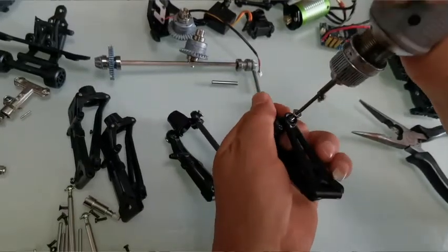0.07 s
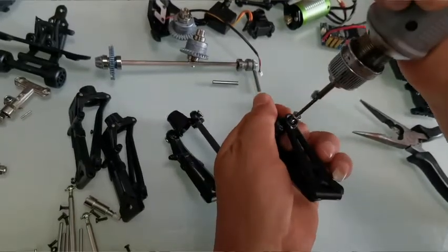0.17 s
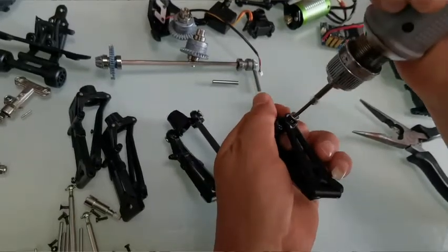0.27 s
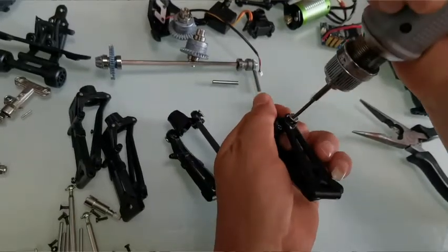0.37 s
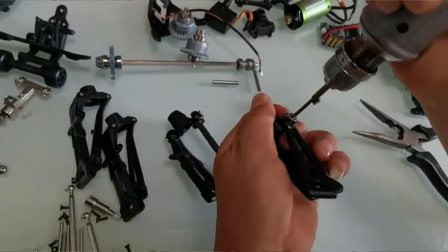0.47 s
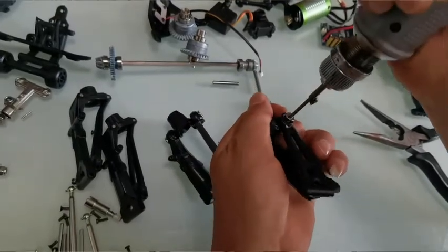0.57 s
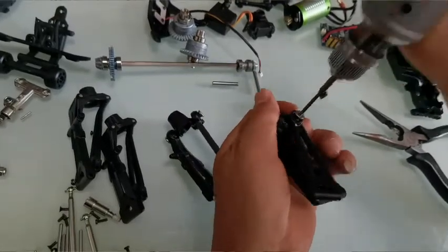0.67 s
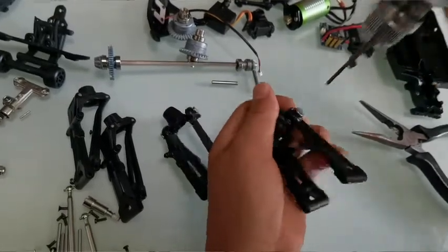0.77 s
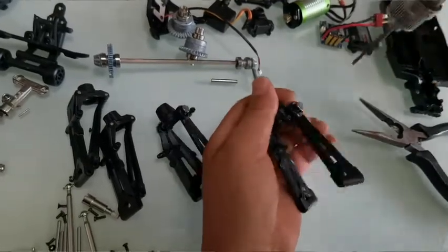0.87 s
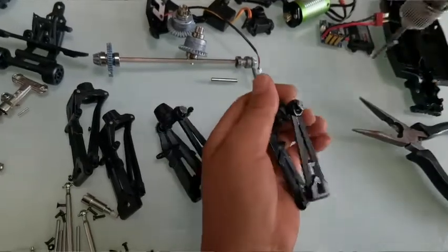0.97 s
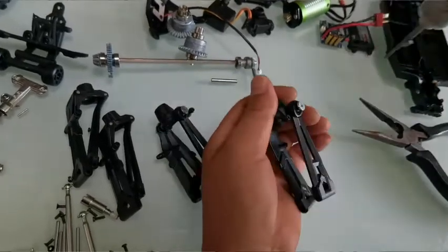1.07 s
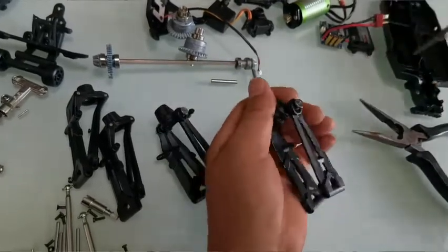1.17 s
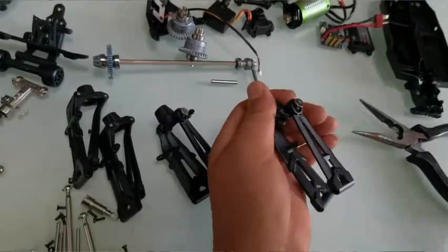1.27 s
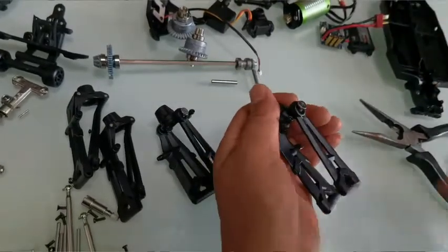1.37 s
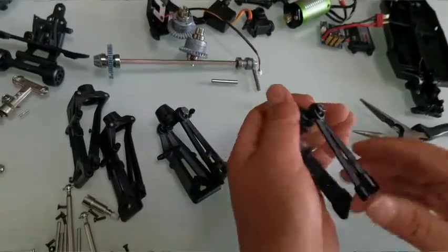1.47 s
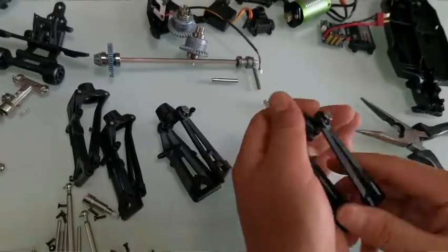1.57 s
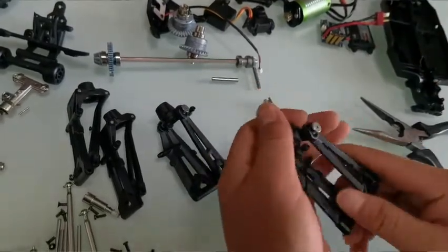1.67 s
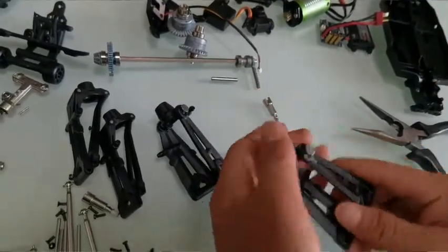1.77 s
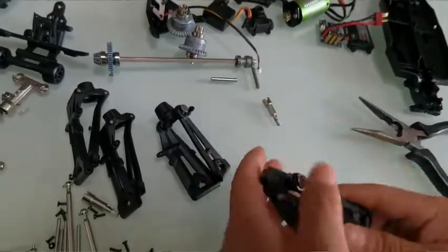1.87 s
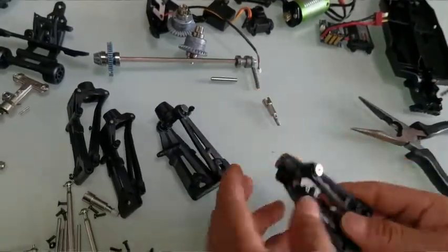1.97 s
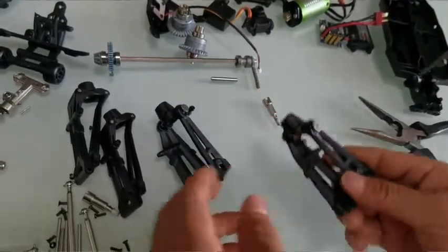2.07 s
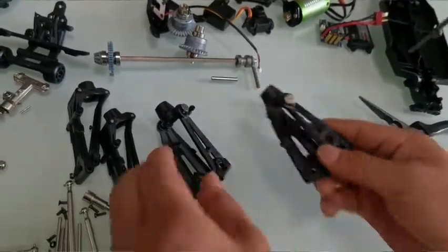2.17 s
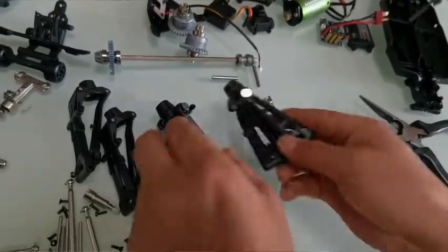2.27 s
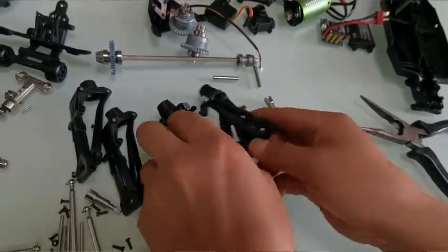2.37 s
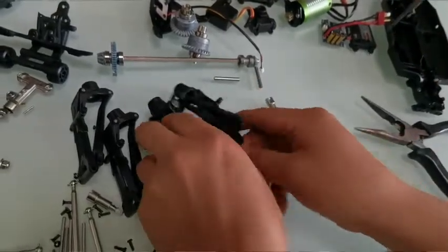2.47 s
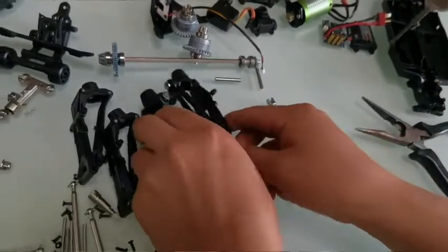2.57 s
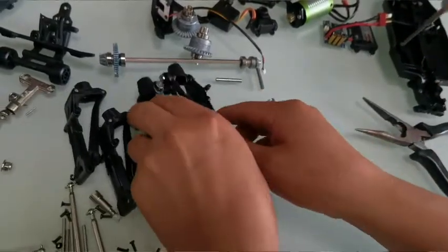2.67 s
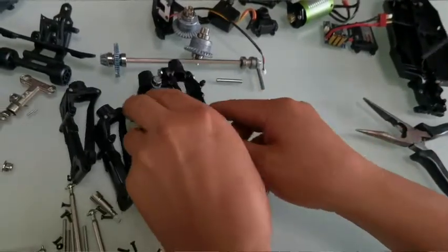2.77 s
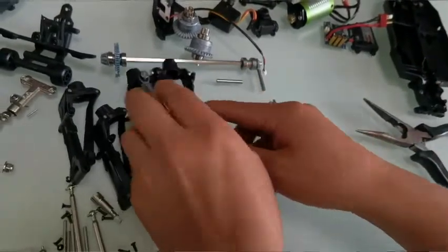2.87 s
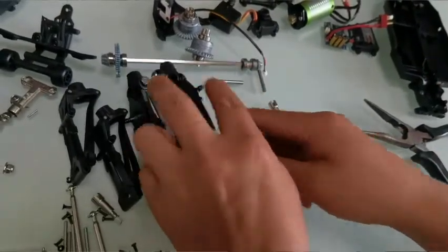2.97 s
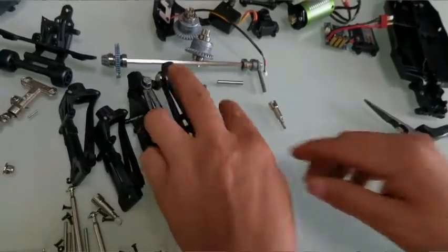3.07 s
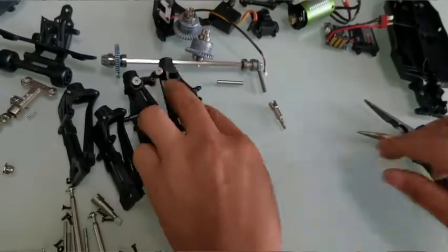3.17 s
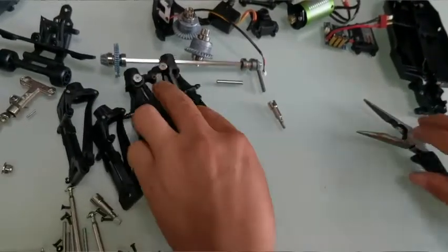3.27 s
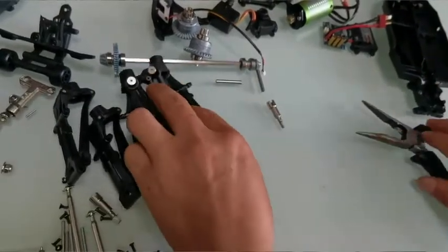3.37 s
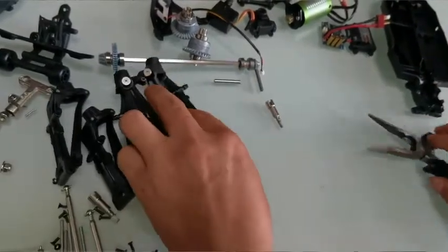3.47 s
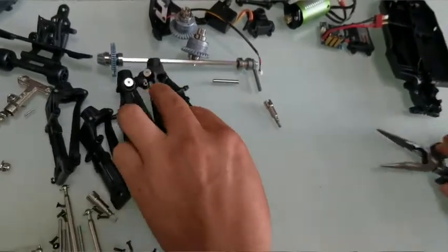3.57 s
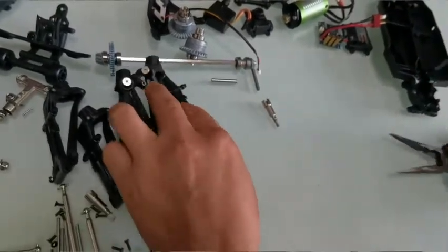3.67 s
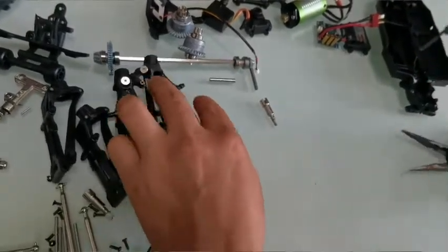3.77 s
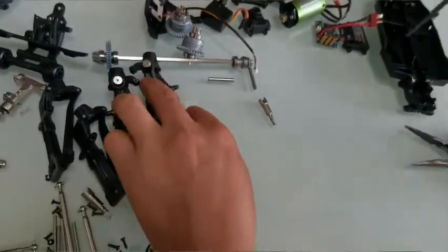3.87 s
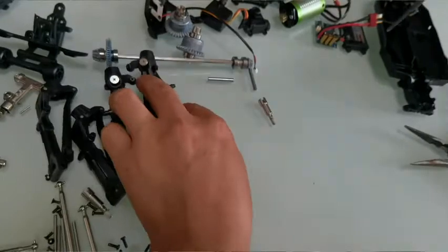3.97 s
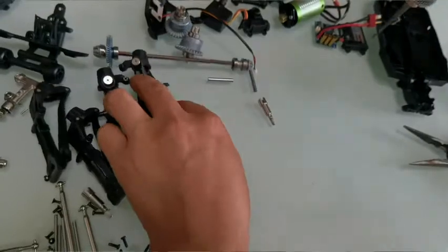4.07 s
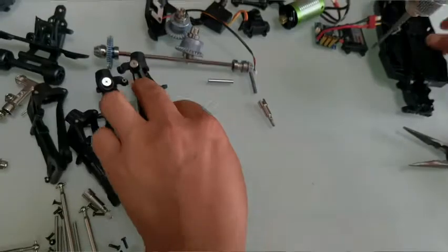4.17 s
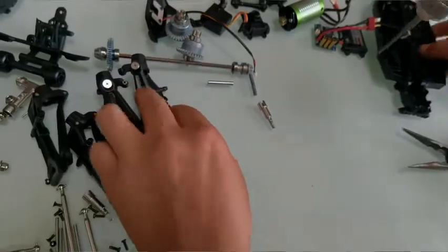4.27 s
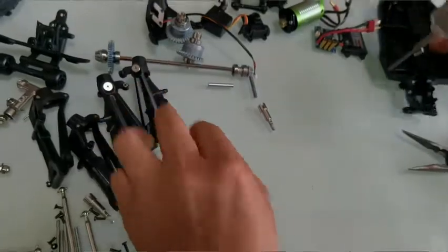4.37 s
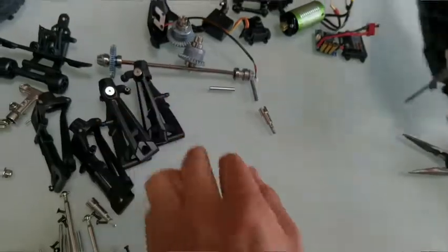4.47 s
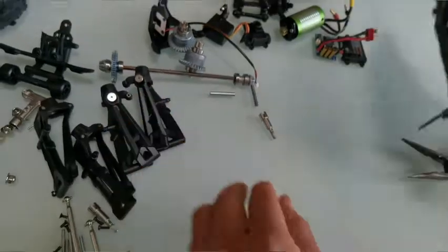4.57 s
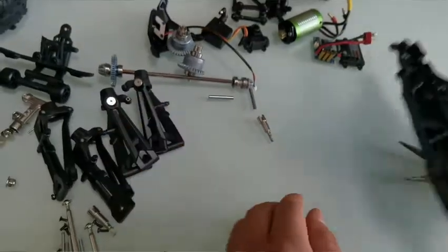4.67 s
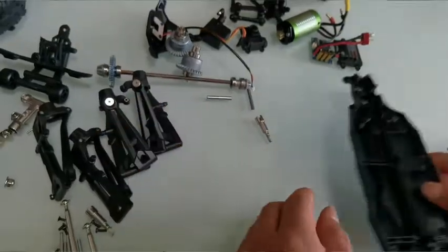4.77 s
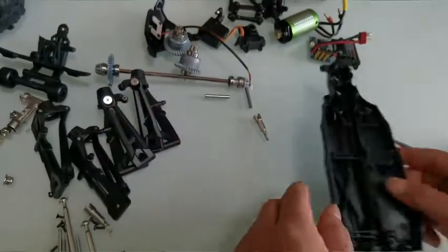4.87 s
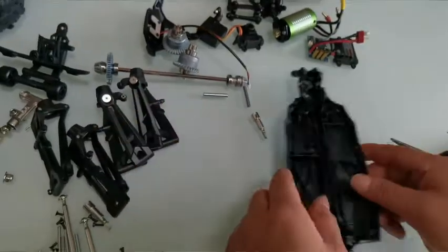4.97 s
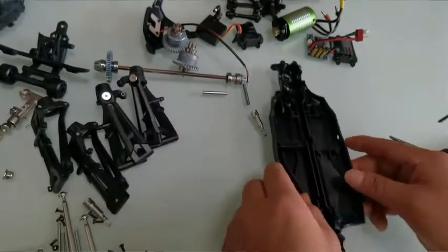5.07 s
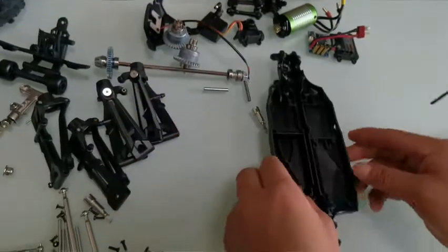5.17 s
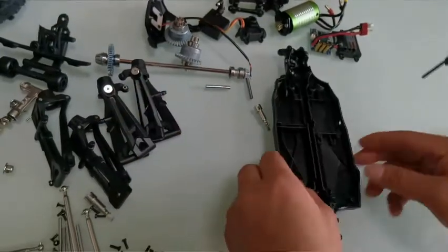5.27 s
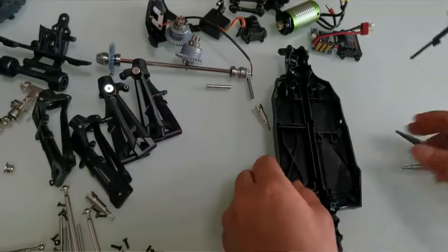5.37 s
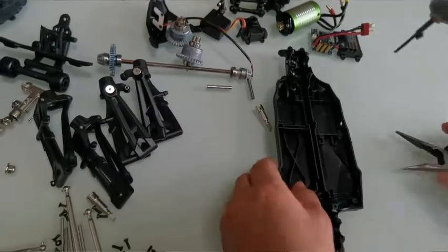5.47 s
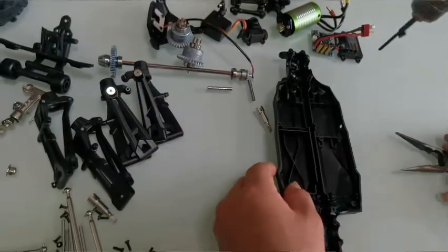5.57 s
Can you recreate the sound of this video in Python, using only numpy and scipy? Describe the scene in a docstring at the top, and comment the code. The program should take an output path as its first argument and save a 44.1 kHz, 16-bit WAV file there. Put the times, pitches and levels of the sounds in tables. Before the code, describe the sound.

A small cordless screwdriver whirs briefly and its clutch ratchets, then light plastic parts clatter and tap on a table before a hollow plastic shell knocks down.

```python
"""A cordless screwdriver spins up with grinding gears, brush buzz and gear whine, and drives a screw into
a plastic suspension arm; its clutch ratchets in dull and bright steel clacks until it stops on a rising tone.
Then plastic arms chatter and ring, pliers and parts tap on a work table amid faint bands of hiss,
a part squeaks, and arms bump the table top. Last, a hollow plastic chassis is set down: a crack, shell modes
and a buzz. Room air and a low rumble run throughout, heard from close above the table in a small room."""
import sys
import numpy as np
from scipy import signal
from scipy.fft import rfft, irfft
from scipy.io import wavfile
from scipy.ndimage import uniform_filter1d, map_coordinates

SR = 44100
rng = np.random.default_rng(int(sys.argv[2]) if len(sys.argv) > 2 else 0)


def dump(signal):
    """Clip the signal to [-1, 1] and save it as 16-bit WAV at the path in sys.argv[1]."""
    limited = np.clip(np.atleast_2d(signal).T, -1, 1)
    pcm = np.round(limited * 32767).astype(np.int16)
    wavfile.write(sys.argv[1], SR, pcm)


N = 248269
TIME = np.arange(N) / SR

# Table top colour. Each row: frequency in Hz, relative level in dB per Hz.
TABLE_COLOUR = [(40, -41), (120, -14.5), (330, -1.5), (620, 5.5), (950, 1), (1450, 8), (2300, 1.5),
                (3100, -1), (4300, -1), (5600, -11), (8200, -20), (11800, -27), (15500, -45.5)]

# trigger pressed, screw starts to bite, clutch breaks loose, trigger let go
ON_S, BITE_S, BREAK_S, OFF_S = .043, .293, .4727, .631
# gearbox swell after the start; shaft slowing under the brake
SWELL_S, BRAKE_S = 0.11, .04


def amp(db):
    """Decibels to gain."""
    return 10 ** (np.asarray(db) / 20)


def unit(x):
    """Scales to an rms of one."""
    return x / np.sqrt(np.mean(x ** 2) + 1e-20)


def read(points, hz):
    """Reads a table along a logarithmic frequency axis."""
    f, value = np.transpose(points)
    return np.interp(np.log(hz + 1), np.log(f + 1), value)


def curve(points):
    """Reads a table of (s, value) at every sample."""
    return np.interp(TIME, *np.transpose(points))


def add(mix, start_s, sound):
    """Mixes a stereo sound in at start_s."""
    part = mix[:, round(start_s * SR):][:, :sound.shape[1]]
    part += sound[:, :part.shape[1]]


def smooth_noise(count, size):
    """Slow random wander of unit rms: white noise averaged over size samples."""
    return unit(uniform_filter1d(rng.standard_normal(count), size))


def pair(count, same):
    """Two channels of white noise that share a part."""
    common, *own = rng.standard_normal((3, count))
    share = np.clip(same, 0, 1)
    return np.sqrt(share) * common + np.sqrt(1 - share) * np.array(own)


def colour(x, spectrum, tilt_db=0, size=2048):
    """Minimum-phase filter of unit energy with the given spectrum, tilted per octave above 500 Hz."""
    hz = abs(np.fft.fftfreq(size, 1 / SR))
    log_gain = np.log(amp(read(spectrum, hz) + tilt_db * np.log2(np.maximum(hz, 500))))
    kernel = np.fft.ifft(np.exp(signal.hilbert(log_gain).conj())).real[:size // 2]
    kernel /= np.linalg.norm(kernel)
    return signal.oaconvolve(x, kernel[None], axes=1)[:, :x.shape[1]]


def burst(decay_s, same, grain_db=0, size=12000):
    """A contact: a spray of tiny uneven impacts that dies away."""
    fade = np.exp(-np.arange(size) / SR / decay_s)
    grains = amp(grain_db * smooth_noise(size, 24))
    return unit(pair(size, same) * grains * fade) * np.sqrt(np.mean(fade ** 2))


def ring(modes, spread, size=12000):
    """Decaying modes; each reaches the two microphones in slightly different phase."""
    t = np.arange(size) / SR
    out = np.zeros((2, size))
    for hz, db, t60_s in modes:
        phase = spread * rng.standard_normal((2, 1))
        out += amp(db - 60 * t / t60_s) * np.sin(2 * np.pi * hz * t + phase)
    return out


def room(x, wet_db, size=22000):
    """Adds a dense tail of sparse reflections, each band dying at its own speed."""
    # Each row: frequency in Hz, t60 in s.
    decay_times = [(200, .24), (1000, .28), (3000, .3), (7000, .3), (12000, .31), (16000, .26)]
    echoes = rng.standard_normal((2, size)) * (rng.random((2, size)) < .15)
    echoes[:, :round(.003 * SR)] = 0
    hz, t, z = signal.stft(echoes, SR, nperseg=256)
    fade_db = -60 * t / read(decay_times, hz)[:, None]
    tail = signal.istft(z * amp(fade_db), SR)[1]
    tail /= np.linalg.norm(tail, axis=1, keepdims=True)
    return x + amp(wet_db) * signal.fftconvolve(x, tail, axes=1)[:, :N]


def background(air_db=-62, split_hz=350):
    """Steady room air over a near-mono rumble that swells and sinks."""
    # Colour of air and rumble. Each row: frequency in Hz, relative level in dB per Hz.
    air_colour = [(18, -23.5), (35, -6.5), (50, 1.5), (66, -10), (92, 0), (160, -13), (230, -9.5),
                  (400, -21), (1250, -21.5), (2600, -32.5), (4400, -40.5), (5600, -51), (9000, -57),
                  (16000, -53)]
    # Each row: frequency in Hz, left-right correlation.
    likeness = [(60, 1), (130, 0.97), (290, 0.91), (640, 0.22), (1410, -0.22), (3100, -0.59), (6820, 0.55),
                (15000, 0.78)]
    # Drift of the rumble. Each row: time in s, level in dB.
    rumble_db = [(0, -54.5), (.5, -61.5), (2.3, -63.5), (2.55, -59), (4.2, -56), (5.63, -56.5)]
    hz = np.fft.rfftfreq(N, 1 / SR)
    left, other = rfft(rng.standard_normal((2, N)))
    same = np.clip(read(likeness, hz), -1, 1)
    right = same * left + np.sqrt(1 - same ** 2) * other
    z = np.array([left, right]) * amp(read(air_colour, hz))
    whole = irfft(z, N)
    low = irfft(z / (1 + (hz / split_hz) ** 4), N)
    air = amp(air_db) * (whole - low) / whole.std()
    return air + amp(curve(rumble_db)) * unit(low)


def hisses():
    """Faint noise, each in one broad band with an uneven level that swells or fades."""
    # Faint bands of hiss, some swelling, some fading; one high hiss rises into the clatter at 2.98 s.
    # Each row: start in s, length in s, level in dB, centre in Hz, width in octaves, unevenness in dB,
    # swell from start to end in dB.
    hiss_bands = [(1.834, 0.14, -80, 6870, 0.61, -2, -5), (2.558, 0.28, -68.5, 754, 0.43, 3, 0),
                  (2.783, 0.33, -74.5, 12800, 0.94, -4, 22), (2.85, 0.13, -77, 2200, 0.71, 1, 8),
                  (3.163, 0.21, -61.5, 1300, 0.73, 2.5, -4), (3.189, 0.083, -67, 3830, 0.68, 7, 2),
                  (3.504, 0.13, -70.5, 11700, 1, 5.5, -3), (3.55, 0.88, -63.5, 212.5, 0.26, 2.5, -1),
                  (3.711, 0.2, -73, 575, 0.51, 2, 2), (4.047, 0.091, -63, 1267, 0.24, 1.5, 11)]
    out = np.zeros((2, N))
    for start_s, length_s, db, hz, octaves, uneven_db, swell_db in hiss_bands:
        count = round(length_s * SR)
        band = [(hz / 8 ** octaves, -30), (hz / 2 ** octaves, -4), (hz, 0), (hz * 2 ** octaves, -4),
                (hz * 8 ** octaves, -35), (hz * 64 ** octaves, -65)]
        envelope_db = uneven_db * smooth_noise(count, 300) + np.linspace(0, swell_db, count)
        hiss = colour(pair(count, same=0.077) * unit(amp(envelope_db)), band)
        add(out, start_s, amp(db) * hiss * signal.windows.tukey(count, .6))
    return room(out, wet_db=-5.0)


def rising_tones(waver=.025):
    """Short rough tones: sines that glide upwards with a random waver in pitch."""
    # A short hollow tone rising as the motor stops, then a part squeaking on the table.
    # Each row: start in s, length in s, level in dB, from Hz, to Hz.
    glides = [(0.635, 0.049, -57.5, 860, 960.6), (3.225, 0.052, -60.5, 887, 1124)]
    out = np.zeros((2, N))
    for start_s, length_s, db, from_hz, to_hz in glides:
        count = round(length_s * SR)
        hz = np.linspace(from_hz, to_hz, count) * (1 + waver * smooth_noise(count, 100))
        tone = np.sin(2 * np.pi * np.cumsum(hz) / SR + rng.random((2, 1)))
        add(out, start_s, amp(db) * tone * signal.windows.tukey(count, .5))
    return room(out, wet_db=-7.5)


def bumps(tick_db=-5, rise_s=0.0021):
    """Soft, low knocks of the table top, each with a faint tick of plastic."""
    # The hand presses the arms against the table. Each row: start in s, level in dB.
    presses = [(3.766, -57.5), (3.805, -66), (3.8642, -52.5)]
    # Low table top resonances. Each row: frequency in Hz, level in dB, t60 in s.
    top_modes = [(361, 1.5, .06), (544, 6, 0.04), (607, -7, .06), (676, -8, 0.046), (1060, -16, 0.044)]
    out = np.zeros((2, N))
    for start_s, db in presses:
        tick = colour(burst(0.0064, same=.3), TABLE_COLOUR)
        knock = ring(top_modes, spread=0.45) + amp(tick_db) * tick
        swell = 1 - np.exp(-TIME[:knock.shape[1]] / rise_s)
        add(out, start_s, amp(db) * knock * swell)
    return room(out, wet_db=-4)


def taps(rise_s=0.00079, ring_t60_s=.13):
    """Small rattling contacts coloured by the table top; each touched part rings at its own pitch."""
    # Light taps of bit, pliers and fingers. Each row: start in s, level in dB, tilt in dB per octave,
    # decay in s, ring in Hz, ring level in dB relative to the tap.
    touches = [(0.7405, -48, 8, 0.0055, 1400, -26), (0.8102, -60.5, 12.5, 0.0059, 4380, -18),
               (2.553, -51.5, 6.5, 0.0092, 3100, -11), (2.571, -49.5, -1, 0.0096, 650, -10),
               (2.619, -55, 2, 0.015, 1450, -8), (2.661, -59.5, 2, 0.011, 1400, -10),
               (2.8207, -56.5, 11.5, 0.0041, 1455, -9), (2.9179, -63.5, 1, 0.044, 1366, 5),
               (3.198, -56.5, 9, 0.0073, 1740, -1), (3.224, -61, 0, .008, 2300, -18),
               (3.264, -59.5, 6, 0.011, 4100, -9), (3.302, -48, 4, 0.012, 1727, -6),
               (3.326, -52.5, 0, 0.015, 2480, -9), (3.417, -54, 0, 0.016, 1706, -6),
               (3.521, -63, 5.5, 0.015, 3170, -14), (3.611, -60, -1.5, 0.025, 1304, -1),
               (3.9143, -61.5, -1.5, 0.045, 1500, -4), (3.9618, -58.5, -3, 0.012, 3190, -13),
               (4.123, -55.5, -1.5, 0.012, 1473, -6.5), (4.351, -53.5, -3.5, 0.0098, 1398, -2),
               (5.582, -57, -5, 0.015, 1270, -19)]
    out = np.zeros((2, N))
    for start_s, db, tilt_db, decay_s, hz, ring_db in touches:
        contact = colour(burst(decay_s, same=0.32, grain_db=2.0), TABLE_COLOUR, tilt_db)
        swell = 1 - np.exp(-TIME[:contact.shape[1]] / rise_s)
        tone = ring([(hz, ring_db, ring_t60_s)], spread=.6)
        add(out, start_s, amp(db) * swell * (contact + tone))
    return room(out, wet_db=-3)


def arms(ring_db=-19, tick_db=3, lean_db=0.8):
    """A hard first tick, then the light parts chatter against each other and ring, left of centre."""
    # Arms dropped and pushed together. Each row: start in s, level in dB, tilt in dB per octave,
    # chatter decay in s.
    clatters = [(2.415, -31, -0.5, 0.021), (2.431, -36.5, 3.5, 0.016), (2.488, -51, 1, 0.013),
                (2.5171, -44.5, 0.5, 0.022), (2.9789, -46, 2.5, 0.011), (2.987, -31.5, 3.5, 0.013),
                (2.999, -31.5, 11, 0.0074), (3.0402, -42, 1, 0.014), (3.2463, -59.5, 3, 0.0022)]
    # Plastic arm colour. Each row: frequency in Hz, relative level in dB per Hz.
    arm_colour = [(130, -18), (260, -9), (560, -2), (830, -2), (1080, -9), (1450, 3), (2000, -1),
                  (2400, -2), (3000, -5.5), (4100, -2), (4700, -4.5), (6200, -10.5), (7000, -7),
                  (8500, -9.5), (11500, -3.5), (13500, -12), (16000, -19)]
    # Plastic arm resonances. Each row: frequency in Hz, level in dB, t60 in s.
    arm_modes = [(540, -1.5, 0.035), (1410, -1, 0.063), (1690, -7, 0.076), (2330, -13, 0.13),
                 (2440, -10, 0.12), (3100, 4, 0.061), (4033, -11, .13), (4450, -5, 0.11), (11370, -5, .15)]
    out = np.zeros((2, N))
    for start_s, db, tilt_db, decay_s in clatters:
        chatter = burst(decay_s, same=0.29, grain_db=3.0)
        tick = amp(tick_db) * burst(0.000073, same=0.55)
        contact = colour(chatter + tick, arm_colour, tilt_db)
        add(out, start_s, amp(db) * (contact + amp(ring_db) * ring(arm_modes, spread=0.67)))
    return room(out * amp([[lean_db], [-lean_db]]), wet_db=-3.5)


def chassis(ring_db=-6, buzz_db=-16, crack_s=0.004, buzz_s=0.035, wet_db=-7, wet_tilt_db=-2):
    """A short crack swings the hollow shell in its modes, ribs buzz on the table, the room answers duller."""
    # Landing, rocking onto the other edge, settling.
    # Each row: start in s, level in dB, tilt in dB per octave.
    landings = [(5.0692, -23.5, 0), (5.0913, -39.5, 7.5), (5.163, -50.5, 0), (5.188, -57.5, 5)]
    # Shell colour. Each row: frequency in Hz, relative level in dB per Hz.
    shell_colour = [(120, -33), (250, -11), (420, -7.5), (590, 7.5), (760, 0), (960, 5), (1300, 5),
                    (1600, -3), (2000, 0), (2400, -10), (2750, -14), (3050, -19), (3500, 0.5), (4100, -4),
                    (5500, -30), (7200, -21), (9000, -44), (11500, -28), (16000, -52)]
    # Shell resonances. Each row: frequency in Hz, level in dB, t60 in s.
    shell_modes = [(460, -8, .1), (601, -4, .09), (991, -7, .05), (1273, -4, .11), (1986, -15, .08),
                   (2772, -18, .08), (3520, -5, .04)]
    out, sent = np.zeros((2, 2, N))
    for start_s, db, tilt_db in landings:
        crack = burst(crack_s, same=0.82)
        buzz = amp(buzz_db) * burst(buzz_s, same=.4)
        knock = colour(crack, shell_colour, tilt_db) + amp(ring_db) * ring(shell_modes, spread=0.33)
        add(out, start_s, amp(db) * (knock + colour(buzz, TABLE_COLOUR)))
        dull = colour(crack + buzz, TABLE_COLOUR, tilt_db / 2 + wet_tilt_db)
        add(sent, start_s, amp(db) * dull)
    tail = room(sent, wet_db) - sent
    return out + tail


def mechanism(x, ring_db, wet_db):
    """Sound inside the tool sets its housing ringing, and both reach the room."""
    # Housing resonances. Each row: frequency in Hz, relative level in dB, t60 in s.
    housing = [(975, 0, .07), (1540, -1, .06), (1710, -3, .07), (2320, -4, .07), (3140, -3, .06),
               (4170, -3, .04), (5350, -4, .025), (6790, -5, .06)]
    modes = ring(housing, spread=1.4)
    modes /= np.linalg.norm(modes, axis=1, keepdims=True)
    ringing = signal.fftconvolve(x, modes, axes=1)[:, :N]
    return room(x + amp(ring_db) * ringing, wet_db)


def clutch(decay_s=0.00075, rise_s=0.0006, rattle_db=-25, rattle_s=0.011, lag_s=0.00033):
    """Brief steel clacks, dull and bright, shake the gears; they reach the right microphone first."""
    # Gear train taking up its slack. Each row: time in s, energy in dB, tilt in dB per octave.
    slack = [(0.0497, -4, -1), (0.0543, -14.5, -3)]
    # Balls climbing each notch, a dull clack; columns as above.
    climbs = [(0.4943, 0, 1), (0.5249, 1.5, 0.5), (0.5544, -3, -2), (.5833, -0.5, 0), (0.612, -3.5, -0.5)]
    # Balls snapping home, a bright clack, the first as the clutch breaks loose; columns as above.
    snaps = [(.4728, 0.5, 1.5), (.505, 0.5, 1.5), (.5352, 2, 0.5), (.5644, 1, 1), (.5936, -0.5, 0.5),
             (.6237, 1.5, 1)]
    # Colours of climb and snap. Each row: frequency in Hz, relative level in dB per Hz.
    climb_colour = [(300, -25), (650, -18.5), (950, -1), (1200, -4.5), (1600, -1), (2600, -1.5),
                    (3700, 3.5), (4400, 10.5), (5200, 0), (6300, 2.5), (8000, -7.5), (10500, -9.5),
                    (12300, -5.5), (14000, -9), (15500, -9)]
    snap_colour = [(300, -20.5), (650, -17), (950, -1), (1250, -6), (1700, 1.5), (2400, -4), (3500, -5.5),
                   (4500, 4), (5200, -2.5), (6200, -0.5), (7200, 8.5), (8700, -3), (10000, -2.5),
                   (12100, 7.5), (13300, -1.5), (15500, -4)]
    out = np.zeros((2, N))
    for rows, spectrum in (slack + climbs, climb_colour), (snaps, snap_colour):
        for time_s, db, tilt_db in rows:
            blow = burst(decay_s, same=0.26) + amp(rattle_db) * burst(rattle_s, same=0.12)
            swell = 1 - np.exp(-TIME[:blow.shape[1]] / rise_s)
            clack = colour(blow * swell, spectrum, tilt_db)
            clack /= np.linalg.norm(clack, axis=1, keepdims=True)
            add(out, time_s - lag_s, amp(db) * clack)
    left, right = mechanism(out, ring_db=-15, wet_db=-12)
    return np.array([np.roll(left, round(lag_s * SR)), right])


def drive(t):
    """Shaft speed (Hz) and gearbox level (dB) over one pull of the trigger."""
    # kick-off, spin-up to free speed, sag as the screw bites, drop once the clutch slips
    kick_hz, free_hz, spin_up_s, sag_hz_per_s, slip_drop_hz = 40, 262, .035, 120, 14
    # running level; offsets at the start and while slipping; slip onset; fade under the brake
    gear_db, start_db, slip_db, slip_in_s, brake_db_per_s = -37, -10.5, -6, 0.022, 1495.5
    # gears strain briefly as the clutch breaks loose and as the brake grips
    break_strain_db, brake_strain_db, strain_s = 2, 5.5, .014
    running, biting, braking = (np.maximum(t - s, 0) for s in (ON_S, BITE_S, OFF_S))
    slipping = np.clip((t - BREAK_S) / slip_in_s, 0, 1)
    speed_hz = free_hz - (free_hz - kick_hz) * np.exp(-running / spin_up_s)
    speed_hz -= sag_hz_per_s * biting + slip_drop_hz * slipping
    db = gear_db + start_db * np.exp(-running / SWELL_S) + slip_db * slipping - brake_db_per_s * braking
    db += break_strain_db * np.exp(-((t - BREAK_S) / strain_s) ** 2)
    db += brake_strain_db * np.exp(-((t - OFF_S) / strain_s) ** 2)
    return speed_hz * np.exp(-braking / BRAKE_S), db


def worn_teeth(turns, grind_db, size=1300):
    """A random, lumpy roughness around the ring gear, felt again on every turn."""
    surface = pair(size, same=.3) * amp(grind_db * smooth_noise(size, 40))
    place = [turns % 1 * size]
    return unit(np.array([map_coordinates(side, place, order=3, mode="grid-wrap") for side in surface]))


def motor(flutter=.002, throb=0.19, grind_db=2.0, loose_db=-5, comb_db=-14, knock_db=-12, knocks_per_s=170,
          whine_db=-7, unloaded_db=-5, load_s=0.077,
          mesh_db=-20, mesh_hz=980, mesh_width_hz=230, surge_db=11):
    """Planet gears grind and knock in their play, brushes buzz on shaft harmonics, meshes whine under load."""
    # Motor and gear-mesh lines. Each row: multiple of shaft speed, relative level in dB.
    whine_lines = [(3.75, -12), (5.75, -13), (6, -12), (6.5, -7), (8, -3), (8.75, -6), (14.25, -5),
                   (16, -5), (16.375, -6), (17, -9), (18, -8), (19, -7), (20, -3), (21, 0), (22, -3),
                   (23, -2), (26, -9), (27, -9), (29, -5), (38, -13), (42.625, -11)]
    # Gearbox colour. Each row: frequency in Hz, relative level in dB per Hz.
    gearbox_colour = [(300, -30), (500, -18.5), (800, -8), (1000, -6.5), (1250, -6), (1650, 2), (2300, -3),
                      (2700, -2.5), (3300, 1), (4200, 1.5), (4900, 1.5), (5800, 3.5), (6300, -3.5),
                      (7000, 2), (8600, -5), (11600, 2), (12700, 2), (14200, -4), (16000, -5.5)]
    # per shaft turn: first-stage tooth strikes, planet throbs; shaft turns per carrier turn
    strikes, planet_pass, reduction = 4.5, .75, 8
    count = round((OFF_S + 2 * BRAKE_S) * SR)
    t = TIME[:count]
    steady_hz, level_db = drive(t)
    speed_hz = steady_hz * (1 + flutter * smooth_noise(count, 300))
    angle = 2 * np.pi * np.cumsum(speed_hz) / SR

    def line(k):
        """One shaft harmonic, wavering in strength with uneven tooth contact."""
        return np.cos(k * angle + 2 * np.pi * rng.random((2, 1))) * amp(3 * smooth_noise(count, 1200))

    teeth = worn_teeth(angle / (2 * np.pi * reduction), grind_db) + amp(loose_db) * pair(count, same=0.18)
    rattle = unit(teeth * (1 + throb * np.cos(planet_pass * angle)))
    hits = 1. * (rng.random(count) < knocks_per_s / SR)
    knocks = unit(pair(count, same=0.3) * uniform_filter1d(hits, size=40))
    brushes = unit(sum(line(k) for k in range(3, 62)))
    # whine comes forward as the screw bites
    unloaded = np.clip((BITE_S - t) / load_s + .5, 0, 1)
    whine = unit(sum(amp(db) * line(k) for k, db in whine_lines)) * amp(unloaded_db * unloaded)
    # first stage sings as it sweeps through the lowest housing resonance
    detune = 2 * (strikes * speed_hz - mesh_hz) / mesh_width_hz
    mesh = line(strikes)[0] / (1 + detune ** 4)
    # hardest under the torque surge of the spin-up
    mesh = mesh * amp(surge_db * np.exp(-np.maximum(t - ON_S, 0) / SWELL_S))
    growl = colour(rattle + amp(comb_db) * brushes, gearbox_colour)
    growl += amp(knock_db) * colour(knocks, gearbox_colour, tilt_db=-2.5)
    sound = growl + amp(whine_db) * whine + amp(mesh_db) * mesh
    out = np.zeros((2, N))
    add(out, 0, sound * amp(level_db) * (t > ON_S))
    return mechanism(out, ring_db=-13.5, wet_db=-15.5)


def scene():
    """Tool, parts and hisses, with less stereo width at low frequencies, over the background."""
    # Gain of the left-right difference. Each row: frequency in Hz, gain in dB.
    width = [(150, -11.5), (450, -9), (1000, 1), (4000, 2), (9000, -6)]
    left, right = hisses() + rising_tones() + bumps() + taps() + arms() + chassis() + clutch() + motor()
    mid, side = (left + right) / 2, (left - right) / 2
    side = irfft(rfft(side) * amp(read(width, np.fft.rfftfreq(N, 1 / SR))), N)
    return np.array([mid + side, mid - side]) + background()


def record(dry, edge_hz=15950):
    """Left microphone favours the presence range, right one the top treble; then the band limit."""
    # Each row: frequency in Hz, dB by which the left microphone is louder.
    lean = [(1000, 0.5), (2500, 1.5), (4500, 2.5), (7500, 3), (10500, -3.5), (16000, -3.5)]
    lean_db = read(lean, np.fft.rfftfreq(N, 1 / SR)) / 2
    heard = irfft(rfft(dry) * amp([lean_db, -lean_db]), N)
    lowpass = signal.firwin(511, edge_hz, window=("kaiser", 9), fs=SR)
    return signal.oaconvolve(heard, lowpass[None], "same")


dry = scene()
out = record(dry)
dump(out)
```